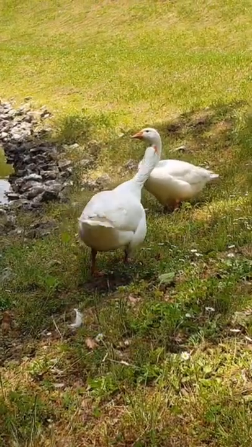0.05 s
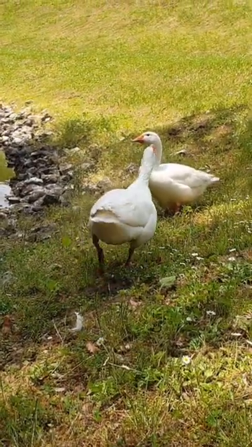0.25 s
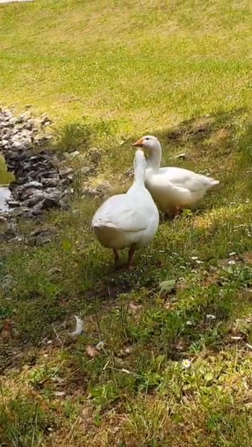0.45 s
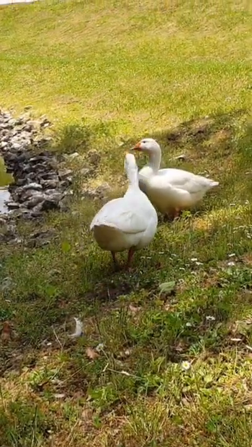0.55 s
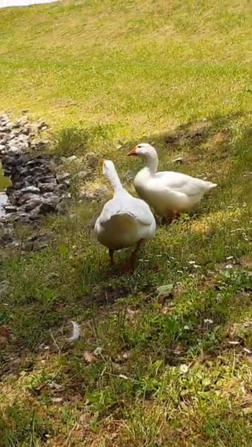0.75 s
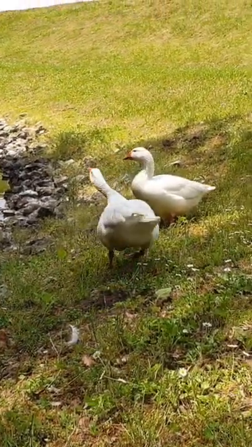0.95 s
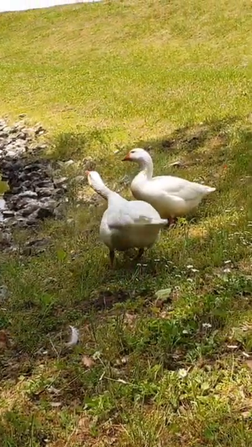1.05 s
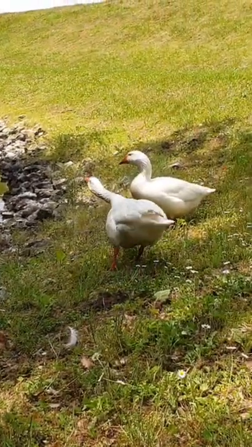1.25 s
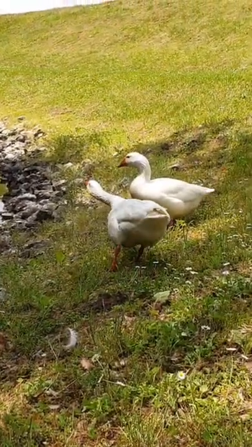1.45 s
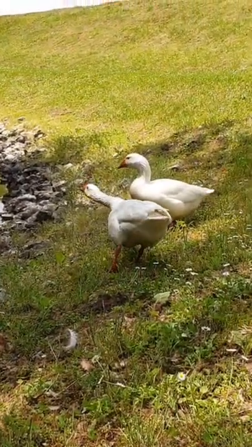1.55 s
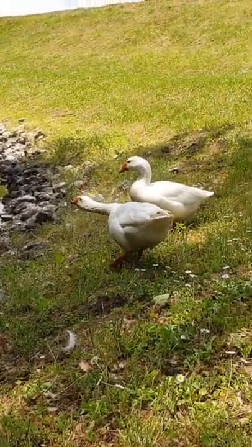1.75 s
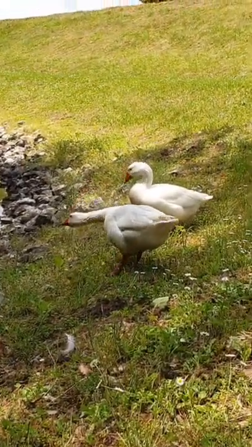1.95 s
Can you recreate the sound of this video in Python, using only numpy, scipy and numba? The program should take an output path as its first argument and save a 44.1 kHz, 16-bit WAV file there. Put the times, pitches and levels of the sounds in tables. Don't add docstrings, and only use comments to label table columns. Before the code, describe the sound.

A goose honks harshly a few metres away. The fading echo of an earlier honk opens over faint wind and far hum. First honk 0.2-0.57 s, swelling twice, with bill clicks at its start; soft falling grunt at 0.8; second honk 0.86-1.26, rising at the end; longer grunt 1.3-1.4; third honk 1.45-1.7, starting higher, more broken and airy. Short bright echoes follow, then quiet air.

```python
import sys
import numpy as np
from scipy import signal
from scipy.fft import rfft, irfft
from scipy.io import wavfile
from scipy.ndimage import uniform_filter1d
from numba import njit

SR = 44100
rng = np.random.default_rng(int(sys.argv[2]) if len(sys.argv) > 2 else 0)


def store_pcm(level_fs):
    pcm = np.round(np.clip(level_fs, -1, 1) * 32767).astype(np.int16)
    wavfile.write(sys.argv[1], SR, np.atleast_2d(pcm).T)


def gain_from_db(level_db):
    decades = np.asarray(level_db, float) / 20
    return 10 ** decades


N = 88200
LEAD = SR // 2
T = np.arange(-LEAD, N) / SR

# time [s], level [dB], pulse pitch [Hz], bill resonance [Hz].
HONKS = [
    [(.207, -38.5, 160.2, 1250), (.226, -18, 159.4, 1310), (.25, -22, 158.9, 1410), (.3, -22, 156.6, 1030),
     (.335, -22, 158.6, 1340), (.385, -18.5, 158, 1514), (.47, -21.5, 155.9, 1370),
     (.53, -18.5, 158.1, 1580), (.572, -22, 154.7, 1374)],
    [(.864, -34.5, 160.4, 1250), (.878, -21, 157.5, 1250), (.94, -25, 157, 1180), (.975, -21, 162.5, 1524),
     (1.03, -20, 156, 1510), (1.09, -20, 159.1, 1560), (1.15, -18.5, 160.6, 1515), (1.21, -18, 163.2, 1583),
     (1.256, -21, 165.1, 1437)],
    [(1.446, -29, 170.4, 1314), (1.468, -19, 172.6, 1450), (1.51, -24, 169.5, 1296),
     (1.545, -24.5, 156.1, 1136), (1.575, -23, 157, 1390), (1.615, -21, 158.6, 1347),
     (1.65, -22.5, 162.2, 1450), (1.695, -22, 161.7, 1410), (1.706, -24.5, 161, 1200)],
]
EARLIER_HONK = [
    (-.3, 3, 160, 1440),
    (-.07, -26.5, 161.3, 1300),
    (-.05, -65, 152, 1450),
]
GRUNTS = [
    [(.802, -73, 141.4, 1120), (.806, -39, 135, 1080), (.832, -31, 134, 1027), (.848, -36.5, 116.8, 910),
     (.856, -47.5, 123.7, 855)],
    [(1.302, -33, 152.9, 1024), (1.32, -31.5, 152.1, 1050), (1.36, -28, 143.2, 1057),
     (1.385, -34, 121.2, 1065), (1.395, -50, 129, 930)],
]
# time [s], timing scatter [ms], alternating late-early pulse shift [ms].
RAGGED = [(.2, .15, .04), (.33, .12, .05), (.36, .03, .075), (.45, .05, .075), (.48, .1, .03),
          (.51, .015, 0), (.57, .03, 0), (.8, .03, 0), (.86, .03, 0), (.87, .12, 0), (.96, .09, 0),
          (1.02, .08, .02), (1.06, .04, .01), (1.17, .035, .015), (1.2, .03, .03), (1.26, .1, 0),
          (1.3, .11, 0), (1.35, .07, 0), (1.44, .12, 0), (1.49, .05, 0), (1.55, .2, 0), (1.585, .02, 0),
          (1.64, .03, 0), (1.67, .04, .03), (1.72, .12, 0)]
# time [s], peak [dB].
SNAPS = [
    (0.208, -10.5),
    (0.2143, -7),
    (0.8653, -16),
    (1.258, -13),
    (1.4464, -14.5),
]
# centre [Hz], width [Hz], level [dB].
HONK_THROAT = [(969, 103, -7), (1908, 360, -6)]
GRUNT_THROAT = [(293.4, 180, -13.5), (520, 54, -15.5)]
HONK_RASP = [(2320, 440, -17.5), (2712, 510, -14), (3190, 440, -12.5), (3873, 1420, -13.5),
             (4833, 1050, -15.5), (6380, 2000, -25)]
GRUNT_RASP = [(3030, 870, -15.5), (4800, 850, -24)]
HISS = [(6620, 4380, 4), (9720, 6500, -3), (12840, 2500, -16)]
# centre [share of bill resonance], width [Hz], level [dB].
HONK_BILL = [(1.083, 310, 2.5), (0.865, 230, 2)]
LAST_BILL = [(1.026, 330, 2.5), (0.941, 275, 0.5)]
GRUNT_BILL = [(0.97, 193, 1.5), (0.714, 53, -8)]
# time [s], length [s], rise (negative: fall) [dB].
SURGES = [
    (.24, 0.072, -0.5),
    (0.898, 0.059, -5.5),
    (1.14, 0.048, 10),
    (1.337, 0.027, 17.5),
    (1.477, 0.099, -5),
    (1.553, 0.032, 13.5),
    (1.594, 0.037, 11),
    (0.473, 0.18, -0.5),
]
# time [s], length [s], pitch [Hz], level [dB].
WHISTLES = [(.23, 0.033, 554, -23), (0.31, 0.041, 530, -21), (0.44, 0.019, 520, -20),
            (.885, 0.022, 520, -19.5), (.95, 0.054, 505, -14.5), (1.0, 0.018, 530, -10.5),
            (1.105, 0.022, 510, -16.5), (1.18, 0.029, 740, -15), (1.16, 0.013, 570, -17),
            (1.21, 0.043, 575, -21.5), (1.4, 0.013, 590, -11), (1.475, 0.037, 513, -17),
            (1.54, 0.017, 530, -9.5), (1.53, .02, 760, -15), (1.69, 0.046, 570, -19),
            (1.54, .03, 290, -20.5), (.3, 0.02, 870, -20), (1.1, 0.053, 860, -16),
            (1.17, 0.026, 270, -28.5)]
# time [s], length [s], centre [Hz], level [dB].
PINCHES = [(.215, 0.012, 3140, -10), (0.302, 0.018, 2160, -10.5), (0.303, 0.023, 3380, -12),
           (0.401, 0.04, 3127, -6.5), (0.473, 0.017, 2400, -14), (0.529, 0.027, 2940, -7),
           (0.536, 0.022, 2679, -18), (0.87, 0.041, 3380, -13), (1.01, 0.019, 3340, -38),
           (1.116, 0.03, 2675, -5), (1.136, 0.017, 3400, -7), (1.153, .015, 4336, -5),
           (1.177, 0.028, 2410, -12), (1.199, 0.023, 3340, -7), (1.229, 0.019, 2970, -8),
           (1.206, 0.022, 2130, -15), (1.143, 0.041, 2100, -15), (1.59, 0.045, 2090, -8)]
# frequency [Hz], left lead [radians], left minus right [dB].
PORTS = [(99, 0.01, 0.6), (1250, 0.7652, 1.5), (1660, 1.5, 6.5), (2170, 0.1, 11), (2580, -1.27, -0.5),
         (5230, 0.44, -9), (6620, -0.33, 4.5), (8540, -1.5, 6), (10100, 0.43, 5)]
HONK_LAG_US = [73.7, 64.5, 135, 135]
GRUNT_LAG_US = [100, 70]
# frequency [Hz], gain [dB].
GROUND = [(1800, 1), (1960, -13.5), (2080, -2.5), (8000, -0.5), (9000, -1.5), (10000, 1.5), (15500, -5)]
GRASS = [(300, -74), (1500, 13), (2100, 8.5), (5000, 7), (8000, 6.5), (13000, 12.5)]
ECHO = [(180, -12), (450, -5.5), (800, 1), (1100, -6), (1600, -5.5), (2600, 5), (5000, 2), (12000, 5.5)]
# frequency [Hz], level [dB per Hz].
AIR = [(25, -30), (48, -22), (90, -22), (200, -12.5), (700, -20.5), (1500, -8.5), (5000, -26), (15000, -36)]


def unit(x):
    return x / np.sqrt(np.mean(x ** 2))


@njit
def svf(x, hz, width):
    y, band, low = np.empty(len(x)), 0., 0.
    for i in range(len(x)):
        g, k = np.tan(np.pi * hz[i] / SR), width / hz[i]
        v = (band + g * (x[i] - low)) / (1 + g * (g + k))
        band, low, y[i] = 2 * v - band, low + 2 * g * v, k * v
    return y


def ring(x, hz, width):
    hz = hz + 0. * x
    return unit(svf(svf(x, hz, 1. * width), hz, 1. * width))


def colour(x, points):
    f, p = np.fft.rfftfreq(x.shape[-1], 1 / SR) + 1, np.array(points)
    gain = gain_from_db(np.interp(np.log(f), np.log(p[:, 0]), p[:, 1]))
    return irfft(rfft(x) * gain, x.shape[-1])


def walk(rate, size):
    k = int(SR / rate)
    steps = np.repeat(rng.standard_normal(100), k)[:size + 2 * k]
    return 1.44 * uniform_filter1d(uniform_filter1d(steps, k), k)[k:size + k]


def swell(t, when, long):
    return np.exp(-((t - when) / long) ** 2)


def air():
    hum = unit(colour(rng.standard_normal((2, len(T))), AIR)) * gain_from_db(-59)
    gust = []
    for _ in range(3):
        buffet = ring(rng.standard_normal(len(T)), 47.7, 34)
        gust.append(buffet * gain_from_db(walk(3.4, len(T))))
    return hum + gain_from_db(-72) * (gust[0] + 2.1 * np.array(gust[1:]))


def syrinx(t, turns):
    n = np.arange(int(turns[-1]) + 1)
    at = np.interp(n, turns, t)
    s, scatter, pairing = np.array(RAGGED).T
    chance = rng.standard_normal((200, 2))[n].T
    shift_ms = np.interp(at, s, scatter) * chance[0] + np.interp(at, s, pairing) * (-1.) ** n
    place = np.clip((at - t[0] + shift_ms / 1000) * SR, 0, len(t) - 2)
    size, i = gain_from_db(1.2 * chance[1]), place.astype(int)
    before = np.bincount(i, size * (1 - place + i), len(t))
    return before + np.bincount(i + 1, size * (place - i), len(t))


def windpipe(x):
    spread_ms, from_hz, to_hz = 2.9, 850, 1900
    f = np.fft.rfftfreq(len(x), 1 / SR)
    late = 0.000993 * spread_ms * np.clip((f - from_hz) / (to_hz - from_hz), 0, 1)
    return irfft(rfft(x) * np.exp(-2j * np.pi * np.cumsum(late) * f[1]), len(x))


def shifting(x, rings):
    out = 0
    for k, (hz, width, db) in enumerate(rings):
        strength = gain_from_db(db + 2.2 * walk(30, len(x)))
        centre = hz * (1 + .02 * walk(30, len(x)))
        out = out + (-1) ** k * strength * ring(x, centre, width)
    return out


def bill_and_throat(pulses, breath, ragged, bill_hz, bill_rings, throat):
    voiced = unit(pulses) + 1.5 * (.06 + ragged) * unit(breath)
    tone = shifting(voiced, throat)
    for k, (share, width, db) in enumerate(bill_rings):
        tone = tone + (-1) ** k * gain_from_db(db) * ring(voiced, bill_hz * share, width)
    steady = np.exp(-ragged / 0.093)
    return unit(windpipe(tone)) + gain_from_db(-18.5) * steady * ring(pulses, 584, 540)


def accents(t, scrape):
    drift = np.cumsum(1 + .025 * walk(70, len(t))) / SR
    out = np.zeros(len(t))
    for s, long, hz, db in WHISTLES:
        if t[0] < s < t[-1]:
            out += gain_from_db(db) * swell(t, s, long) * np.sqrt(2) * np.sin(2 * np.pi * hz * drift)
    for s, long, hz, db in PINCHES:
        if t[0] < s < t[-1]:
            out += gain_from_db(db - 1) * swell(t, s, long) * ring(scrape, hz, 173)
    return out


def breath_hiss(noise, gate, surge):
    out = 0
    for hz, width, db in HISS:
        flicker_db = 1.8 * walk(50, len(noise))
        band = ring(noise * (0.081 + gate), hz, width)
        out = out + gain_from_db(db) * band * gain_from_db(surge * hz / 260000 + flicker_db)
    return out


def call(rows, bill_rings, throat, rasp, chest_db, hiss_db):
    release = np.add(rows[-1], (0.011, -20.5, 0, 0))
    s, level_db, pitch, bill = np.array(list(rows) + [release]).T
    a, b = np.searchsorted(T, [s[0], s[-1]])
    t = T[a:b]
    turns = np.cumsum(np.interp(t, s, pitch)) / SR
    r = np.array(RAGGED)
    ragged = np.interp(t, r[:, 0], r[:, 1])
    pulses = syrinx(t, turns)
    noise = rng.standard_normal((3, SR))[:, :len(t)]
    gate = np.exp(-(turns % 1))
    surge = sum(db * swell(t, when, long) for when, long, db in SURGES)

    tone = bill_and_throat(pulses, gate * noise[1], ragged, np.interp(t, s, bill), bill_rings, throat)
    scrape = unit(pulses) + 1.48 * (.5 + 5 * ragged) * unit(gate * noise[0] ** 3)
    tone = tone + shifting(scrape, rasp) + accents(t, scrape)
    chest = gain_from_db(chest_db) * np.sqrt(2) * np.sin(2 * np.pi * turns)
    thrum = gain_from_db(-48) * ring(noise[0], 48.7, 35)
    buzz = gain_from_db(-21.5) * (.5 + 4 * ragged) * ring(noise[1], 278, 770)
    rumble = gain_from_db(-44 + surge) * ring(noise[1], 100, 40)
    hiss = gain_from_db(hiss_db + surge) * breath_hiss(noise[2], gate, surge)

    fade = signal.windows.tukey(len(t), 200 / len(t))
    out = np.zeros(len(T))
    out[a:b] = (tone + chest + thrum + buzz + rumble + hiss) * gain_from_db(np.interp(t, s, level_db)) * fade
    return out


def honks():
    bills = [HONK_BILL] * len(HONKS) + [LAST_BILL]
    return [call(h, bill, HONK_THROAT, HONK_RASP, -14, -31.5)
            for h, bill in zip([EARLIER_HONK] + list(HONKS), bills)]


def scatter_off(x, t60_s, gap_s, points):
    t = np.arange(SR) / SR
    tail = rng.standard_normal((2, SR)) * gain_from_db(-60 * t / t60_s) * np.clip(t / gap_s - .5, 0, 1)
    tail = tail / np.sqrt((tail ** 2).sum(axis=1, keepdims=True))
    return signal.fftconvolve(colour(x, points)[None], tail, axes=1)[:, :len(T)]


def bank(x):
    grass = gain_from_db(-13) * scatter_off(x, .07, 0.0013, GRASS)
    return grass + gain_from_db(-12) * scatter_off(x, 0.46, 0.023, ECHO)


def snaps():
    x = np.zeros(len(T))
    for s, db in SNAPS:
        x[np.searchsorted(T, s)] = gain_from_db(db)
    y = ring(x, 3094, 1080)
    return y * x.max() / np.abs(y).max()


def grunts():
    return [call(g, GRUNT_BILL, GRUNT_THROAT, GRUNT_RASP, -12, -46.5) for g in GRUNTS]


def ports(x, lag_us):
    f, p = np.fft.rfftfreq(len(x), 1 / SR), np.array(PORTS)
    turn = np.interp(f, p[:, 0], p[:, 1]) + 2 * np.pi * lag_us * 1e-6 * np.maximum(f - 1460, 0)
    half = np.exp(.5j * turn) * gain_from_db(np.interp(f, p[:, 0], p[:, 2]) / 2)
    return np.array([irfft(rfft(x) * half, len(x)), irfft(rfft(x) / half, len(x))])


def scene():
    calls = honks() + grunts()
    clicks = snaps()
    lags_us = list(HONK_LAG_US) + list(GRUNT_LAG_US)
    near = sum(ports(x, lag) for x, lag in zip(calls, lags_us)) + ports(clicks, 56)
    return (colour(near, GROUND) + bank(sum(calls) + clicks) + air())[:, LEAD:]


def roll_off(x):
    return signal.sosfilt(signal.butter(12, 15690, fs=SR, output="sos"), x)


def record(dry):
    top_cut = signal.ellip(8, .2, 70, 15600, fs=SR, output="sos")
    return roll_off(signal.sosfilt(top_cut, dry))


dry = scene()
out = record(dry)
store_pcm(out)
```